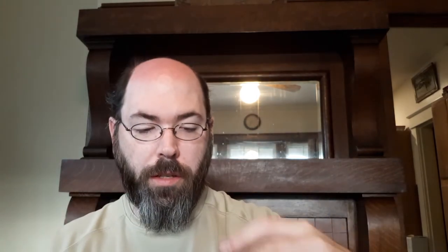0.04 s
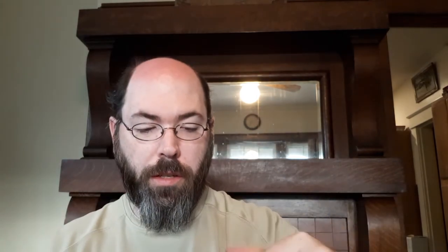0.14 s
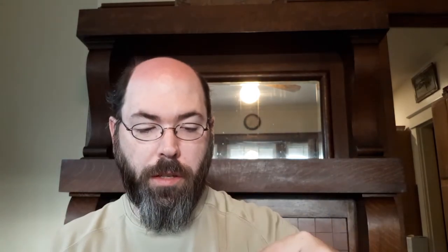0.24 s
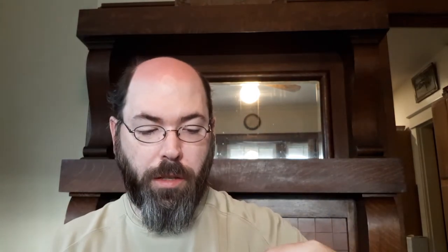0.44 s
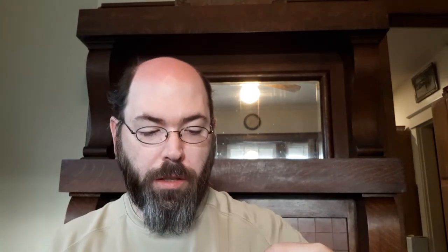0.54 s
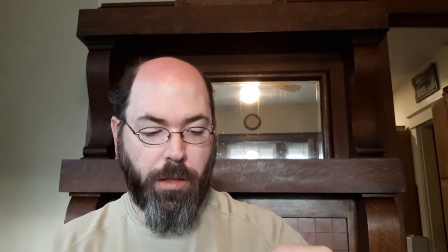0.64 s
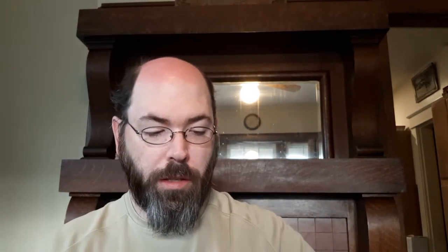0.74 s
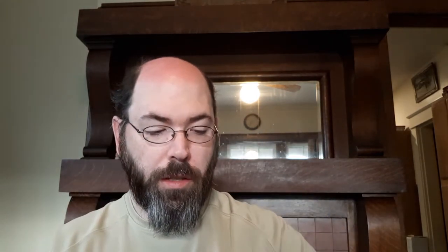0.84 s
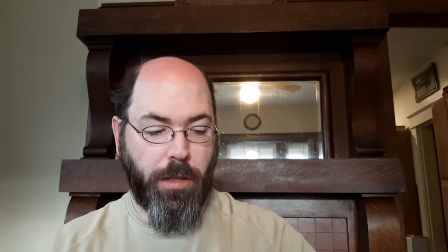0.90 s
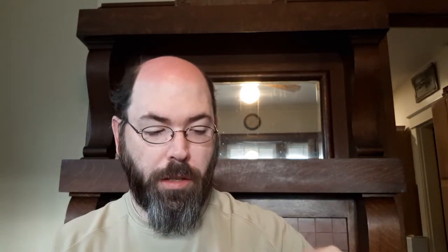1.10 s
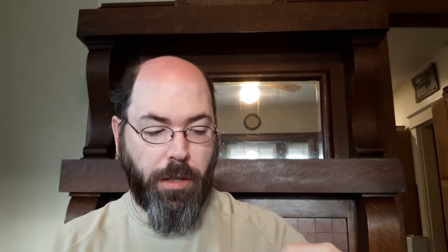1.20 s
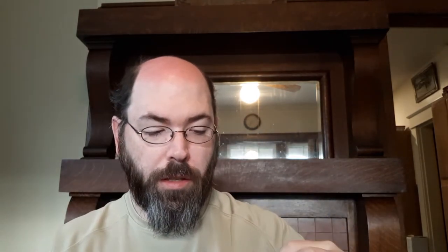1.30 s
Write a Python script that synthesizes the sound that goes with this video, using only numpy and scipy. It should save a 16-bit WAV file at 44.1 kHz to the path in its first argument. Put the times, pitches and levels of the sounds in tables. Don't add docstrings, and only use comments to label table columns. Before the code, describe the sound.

An aluminium canteen is handled close to a stereo microphone in a quiet furnished room: cap taps and a thread squeak, a loud ringing clank, gritty scraping with fainter squeaks, a second hard knock, then small rattles.

```python
import sys
import numpy as np
from scipy import signal
from scipy.fft import rfft, irfft
from scipy.io import wavfile
from scipy.ndimage import uniform_filter1d

SR = 44100
rng = np.random.default_rng(int(sys.argv[2]) if len(sys.argv) > 2 else 0)


def store_pcm(level_fs):
    pcm = np.round(np.clip(level_fs, -1, 1) * 32767).astype(np.int16)
    wavfile.write(sys.argv[1], SR, np.atleast_2d(pcm).T)


def volts_from_decibels(level):
    exponent = np.asarray(level, float) / 20
    return 10 ** exponent


N = 59535
LEAD = 4096
LONG = N + LEAD
CLOCK = (np.arange(LONG) - LEAD) / SR
MID_SIDE = np.array([[1], [-1]])


def curve(table, hz):
    table = np.array(table, float)
    return np.interp(np.log(np.maximum(hz, 1)), np.log(table[:, 0]), table[:, 1])


def unit(x):
    return x / np.sqrt(np.mean(x ** 2))


def over(x, response):
    return signal.fftconvolve(np.atleast_2d(x), np.atleast_2d(response), axes=1)[:, :x.shape[-1]]


def colour(x, table):
    cepstrum = irfft(curve(table, np.arange(513) * SR / 1024) * np.log(10) / 20)
    cepstrum[1:512] *= 2
    cepstrum[513:] = 0
    return over(x, irfft(np.exp(rfft(cepstrum))))


def band(x, hz, width_hz):
    return signal.lfilter(*signal.iirpeak(hz, hz / width_hz, SR), x)


def decay(t, t60):
    return np.exp(-np.log(1000) * t / t60)


# f/Hz, share of chance phase (0-1)
APART = [(300, 0.11), (1500, 0.34), (3000, 0.84), (5000, 0.95), (14000, 1.)]


def ring(pitches, modes):
    t = np.arange(SR // 2) / SR
    turns = rng.uniform(-np.pi, np.pi, len(modes))
    out = 0
    for hz, (db, t60), turn in zip(pitches, modes, turns):
        lead = np.array([[0.5], [-0.5]]) * turn * curve(APART, hz)
        out = out + volts_from_decibels(db) * decay(t, max(t60, 0.005)) * np.sin(2 * np.pi * hz * t + lead)
    return out


def wash(bands):
    t = np.arange(SR // 2) / SR
    out = 0
    for hz, width_hz, db, t60 in bands:
        spread = np.array([[1, 1], [1, -1.4]]) * [1, curve(APART, hz)]
        pair = spread @ rng.standard_normal((2, len(t)))
        narrow = band(band(pair, hz, width_hz), hz, width_hz)
        out = out + volts_from_decibels(db) * unit(narrow) * decay(t, t60)
    return out


def blows(rows, column, length_s, rough, channels, rise_s=0):
    size = 1024
    grit = rng.standard_normal((len(rows), channels, size))
    t = np.arange(1, size + 1) / SR
    fade = np.exp(-t / length_s) * (1 - np.exp(-t / max(rise_s, 1e-6)))
    out = np.zeros((channels, LONG + size))
    for row, g in zip(rows, grit):
        push = rough * g * fade / np.sqrt(np.sum(fade ** 2))
        push[:, 0] += 1 - min(rough, 1)
        i = int(row[0] * SR) + LEAD
        out[:, i:i + size] += volts_from_decibels(row[column]) * push
    return out[:, :LONG]


# f/Hz, level/dB per Hz
AIR = [(25, -16), (90, -11), (125, -9.5), (400, -5), (650, -14.5), (3000, -11.5), (8000, -26.5),
       (16000, -25)]
AIR_DB, HUM_DB, HUM_HZ, HUM_WIDTH_HZ = -62, -70.5, 128, 9.4


def air():
    mid, side, hum = rng.standard_normal((3, LONG))
    tone = colour(mid + 0.41 * side * MID_SIDE, AIR)
    hum = band(hum, HUM_HZ, HUM_WIDTH_HZ)
    return volts_from_decibels(AIR_DB) * unit(tone) + volts_from_decibels(HUM_DB) * unit(hum)


# f/Hz, t60/s
ROOM_T60 = [(250, 1), (1000, 0.4), (3000, 0.54), (7000, 0.38), (14000, 0.21)]
ROOM_DB, ROOM_START_S, ROOM_SIDE = -7.5, 0.0015, 0.86


def room():
    t = np.arange(SR // 2) / SR
    mid, side = rng.standard_normal((2, len(t)))
    noise = rfft(mid + ROOM_SIDE * side * MID_SIDE)
    octave = np.log2(np.maximum(np.arange(noise.shape[1]) * SR / len(t), 100) / 125)
    tail = 0
    for k in range(9):
        share = np.clip(1 - abs(octave - k), 0, 1)
        tail = tail + irfft(noise * share, len(t)) * decay(t, curve(ROOM_T60, 125 * 2 ** k))
    tail = tail * np.clip(t / ROOM_START_S - 1, 0, 1)
    return volts_from_decibels(ROOM_DB) * tail / np.sqrt(np.sum(tail[0] ** 2))


# t/s, level/dB, f/Hz, t60/s
THUMPS = [(.303, -42, 640, 0.069), (.304, -67, 58.7, 0.073), (.305, -49, 250, 0.034),
          (0.328, -47.5, 205, 0.081), (0.329, -44, 529, 0.08), (0.382, -38, 776, 0.05),
          (0.68, -53, 514, 0.036), (.691, -53, 515, 0.044), (1, -57, 590, .05), (.863, -51.5, 472.2, 0.056),
          (1.089, -40, 797, 0.051), (1.108, -50, 154, 0.17), (1.133, -59, 227, 0.53),
          (1.233, -53.5, 153, 0.19), (1.236, -54.5, 390, 0.12)]
THUMP_Q, THUMP_TONE = 1.48, 0.59


def thumps():
    out, noise = np.zeros(LONG), rng.standard_normal(LONG)
    for start, db, hz, t60 in THUMPS:
        t = np.maximum(CLOCK - start, 0)
        width_hz = hz / THUMP_Q
        rumble = unit(band(band(noise, hz, width_hz), hz, width_hz))
        swell = (1 - np.exp(-t * hz / 0.5)) * decay(t, t60)
        out += volts_from_decibels(db) * swell * (rumble + THUMP_TONE * np.sin(2 * np.pi * hz * t))
    return out


# start t/s, jump t/s, end t/s, low level/dB, high level/dB
SQUEAKS = [
    (0.215, 0.2245, 0.233, -38, -32),
    (.233, .232, .244, -30, -23),
    (0.477, 0.472, 0.51, -42, -41.5),
    (.497, 0.497, .507, -42, -32),
    (0.553, 0.5655, .576, -33.5, -28),
]
# multiple of f, level/dB
SQUEAK_TONES = [(1, -2), (2, -12), (3, -24.5), (4, -24.5)]
SQUEAK_LOW_HZ, SQUEAK_HIGH_HZ, SQUEAK_SAG_HZ_PER_S = 1532, 1812, 5700
JUMP_S, SQUEAK_SWELL, SQUEAK_WOBBLE = 0.0046, 0.91, 0.0148


def squeaks():
    wobble = 1 + SQUEAK_WOBBLE * unit(uniform_filter1d(rng.standard_normal(LONG), size=90))
    out = np.zeros(LONG)
    for start, jump, end, low_db, high_db in SQUEAKS:
        up = np.clip((CLOCK - jump) / JUMP_S, 0, 1)
        low_hz = SQUEAK_LOW_HZ - SQUEAK_SAG_HZ_PER_S * np.clip(CLOCK - start, 0, jump - start)
        hz = (low_hz + up * (SQUEAK_HIGH_HZ - low_hz)) * wobble
        phase = 2 * np.pi * np.cumsum(hz) / SR
        off_peak = abs(CLOCK - jump - 0.48 * (end - jump)) / (end - jump)
        swell = volts_from_decibels(-20 * SQUEAK_SWELL * up * off_peak)
        gate = np.clip(np.minimum((CLOCK - start) / 0.0012, (end - CLOCK) / 0.0011), 0, 1)
        level = gate * volts_from_decibels(low_db + up * (high_db - low_db))
        tones = sum(volts_from_decibels(db) * np.sin(k * phase) for k, db in SQUEAK_TONES)
        out += level * swell * np.sqrt(2) * tones
    return out


# t/s, level/dB
RATTLES = [(.182, -50), (.2235, -35), (.2265, -39), (.238, -38), (.306, -23), (.3085, -10), (.692, -18),
           (1.016, -50), (1.233, -40), (.2855, -28.5), (.598, -48), (.6025, -47.5), (.6465, -39),
           (.8665, -37), (1.021, -39), (1.0745, -38), (1.0935, -32.5), (1.1125, -32), (1.1195, -25),
           (1.133, -27), (1.136, -28), (1.1405, -27.5), (1.238, -36), (1.242, -41)]
# f/Hz, level/dB per Hz
RATTLE = [(1000, -11), (3000, -6.5), (5000, -9.5), (7000, 3.5), (8500, -9.5), (12000, -10.5), (16000, -5.5)]
RATTLE_S, CRACK_RISE_S = 0.0023, 0.0013


def rattles():
    chain = blows(RATTLES, column=1, length_s=RATTLE_S, rough=1, channels=2, rise_s=CRACK_RISE_S)
    return colour(chain * np.sqrt(RATTLE_S * SR), RATTLE)


SHOULDER_HZ = [1500, 1665, 1790, 1860, 2350]
# level/dB, t60/s
SHOULDER = [(-6.5, 0.019), (-34, 0.076), (-2, 0.04), (-1.5, 0.027), (-5.5, 0.084)]
# centre f/Hz, width f/Hz, level/dB, t60/s
SHOULDER_WASH = [(2060, 1600, -8, 0.096)]


def shoulder_ring():
    return ring(SHOULDER_HZ, SHOULDER) + wash(SHOULDER_WASH)


# f/Hz, level/dB per Hz
CRACK = [(800, -13), (1100, -2.5), (2000, -6), (3500, -3), (4700, -13), (7100, 1), (8200, -9),
         (16000, -26.5)]


def metal(contact):
    return colour(contact, CRACK)


# t/s, level/dB
SCRAPE = [
    (0.0, -63.5),
    (0.282, -30.5),
    (0.394, -25),
    (0.54, -38.5),
    (1.292, -73),
    (1.35, -64),
]
SCRAPE_DB, SCRAPE_PER_S, SCRAPE_SCATTER_DB, SCRAPE_BODY_DB = -12.5, 900, 1.5, -30


def scrape(shoulder):
    chance = rng.random((2, LONG))
    sizes = volts_from_decibels(-SCRAPE_SCATTER_DB * np.log(chance[1] + 1e-9)) * rng.standard_normal(LONG)
    clicks = unit((chance[0] < SCRAPE_PER_S / SR) * sizes)
    clicks = clicks * volts_from_decibels(np.interp(CLOCK, *np.array(SCRAPE).T) + SCRAPE_DB)
    rung = over(clicks, shoulder / np.sqrt(np.sum(shoulder[0] ** 2)))
    return metal(clicks) + volts_from_decibels(SCRAPE_BODY_DB) * rung


CONTACT_S = 0.0006
# t/s, low modes level/dB, high pair level/dB, neck level/dB
STRIKES = [(-.03, -22.5, -24, -30), (.189, -57, -48, -68), (.3075, -20, -11.5, -31), (.431, -38, -34, -58),
           (.5, -54, -55, -35.5), (.598, -43, -37, -39), (.646, -33, -43.5, -34.5),
           (.692, -35, -39.5, -23.5), (.8655, -36, -29, -38.5), (.895, -30, -55, -55),
           (.925, -59, -49, -61.5), (1.019, -43, -38.5, -54), (1.038, -39, -49, -54),
           (1.091, -47, -34.5, -39.5), (1.115, -39, -40, -47), (1.238, -34, -43, -46)]
BELL_HZ = [2336, 2460, 2735]
# level/dB, t60/s
BELL = [(-10.5, 0.19), (-18.5, 0.15), (-13, 0.25)]
BASE_HZ = [3353, 3357]
# level/dB, t60/s
BASE = [(-8.5, 0.45), (-2.5, 0.11)]
NECK_HZ = [4039]
# level/dB, t60/s
NECK = [(0.5, 0.096)]
# t/s, level/dB
GRIP = [(0, 0.5), (.3, -0.5), (.348, 0), (.358, -9), (.42, -12), (.432, -3), (.462, -2), (.47, -14),
        (.59, -4), (.596, -0.5), (.905, -0.5), (.915, -13), (.93, 0), (1.13, -1.5), (1.14, -6), (1.35, -5)]


def bells():
    rings = ring(BELL_HZ, BELL), ring(BASE_HZ, BASE), ring(NECK_HZ, NECK)
    struck = []
    for column, bell in enumerate(rings, start=1):
        push = blows(STRIKES, column, length_s=CONTACT_S, rough=0.26, channels=1)
        struck.append(over(push, bell))
    low, pair, neck = struck
    return low + neck + pair * volts_from_decibels(np.interp(CLOCK, *np.array(GRIP).T))


# t/s, crack level/dB, belly level/dB, shoulder level/dB, wall level/dB
KNOCKS = [(0.186, -39, -44.5, -47, -72), (0.1913, -38.5, -46.5, -40, -65), (0.2235, -26.5, -27.5, -31, -68),
          (0.2845, -33, -36, -39, -45), (0.3018, -25, -44, -33.5, -39), (0.3053, -8, -34.5, -27.5, -42),
          (0.3078, -0.5, -24, -19, -47), (0.3139, -18, -29, -15, -39), (0.3349, -27, -33.5, -48, -49),
          (0.3874, -27, -60, -36, -34.5), (0.463, -38, -39.5, -36, -45), (0.4818, -31.5, -52, -34, -65),
          (0.4996, -34.5, -39, -32.5, -41), (0.5447, -37.5, -50, -40, -59), (0.597, -39, -43.5, -33.5, -50),
          (0.6449, -42, -51, -40.5, -43)]
# t/s, crack, belly, shoulder, wall level/dB
LATE_KNOCKS = [(0.6908, -11, -27, -19, -21.5), (0.7022, -14.5, -36.5, -41, -41),
               (0.8475, -34, -43, -53, -59), (0.8639, -22, -43, -25.5, -43), (0.8924, -39, -59, -37, -73),
               (1.0195, -29, -45, -42.5, -56), (1.0378, -35.5, -53.5, -31.5, -58),
               (1.071, -34, -46, -64, -59), (1.0835, -41, -35, -37, -65),
               (1.0907, -32, -38.5, -35.5, -42.5), (1.1144, -25.5, -40, -34, -59),
               (1.1345, -25, -52, -39.5, -45), (1.1395, -26.5, -42.5, -41, -74),
               (1.2365, -34, -38.5, -38, -47)]
# t/s, crack, belly, shoulder, wall level/dB
EARLIER_KNOCK = [
    (-0.044, -16.5, -42.5, -26.5, -33),
]
ALL_KNOCKS = list(EARLIER_KNOCK) + list(KNOCKS) + list(LATE_KNOCKS)
CRACK_S = 0.002


def cracks():
    burst = blows(ALL_KNOCKS, column=1, length_s=CRACK_S, rough=0.92, channels=2, rise_s=CRACK_RISE_S)
    burst = burst * np.sqrt(CRACK_S * SR / 2)
    return volts_from_decibels(-0.5) * metal(burst + 0.27 * burst[::-1])


RIM_HZ = [5425, 5830, 5890, 6617, 6778, 6947, 7122, 7212, 10572]
# level/dB, t60/s
RIM = [(0, 0.039), (-4.5, 0.08), (-4, 0.077), (-11.5, 0.11), (-10.5, 0.148), (3.5, 0.062), (-0.5, 0.06),
       (-4, 0.11), (-7, 0.028)]
# centre f/Hz, width f/Hz, level/dB, t60/s
RIM_WASH = [(5820, 2900, -8, 0.35), (10600, 6300, -16, 0.17), (14700, 14000, -9.5, 0.2)]
BODY_HZ = [1072, 1100, 1258]
# level/dB, t60/s
BODY = [(-3, 0.099), (-3, 0.099), (-9.5, 0.078)]
# centre f/Hz, width f/Hz, level/dB, t60/s
BODY_WASH = [(1163, 270, -6.5, 0.083)]
WALL_HZ = [2315, 4420, 4580, 4980, 5344, 5500]
# level/dB, t60/s
WALL = [(-2, 0.1), (-5, 0.088), (-10, 0.077), (3.5, 0.093), (-3, 0.062), (-4, 0.055)]
# centre f/Hz, width f/Hz, level/dB, t60/s
WALL_WASH = [(4610, 1900, -3.5, 0.31)]
RIM_DB, BODY_DB, SHOULDER_DB, WALL_DB = -17, 0, 0, -2.5


def shell(shoulder):
    rim = ring(RIM_HZ, RIM) + wash(RIM_WASH)
    belly = ring(BODY_HZ, BODY) + wash(BODY_WASH)
    wall = ring(WALL_HZ, WALL) + wash(WALL_WASH)
    families = [(RIM_DB, rim), (BODY_DB, belly), (SHOULDER_DB, shoulder), (WALL_DB, wall)]
    out = 0
    for column, (db, response) in enumerate(families, start=1):
        push = blows(ALL_KNOCKS, column, length_s=CONTACT_S, rough=0.64, channels=1)
        out = out + volts_from_decibels(db) * over(push, response)
    return out


def highpass(x, hz):
    return signal.sosfilt(signal.butter(4, hz, "high", fs=SR, output="sos"), x)


THIN_HZ, THUD_HZ, THUD_DB = 920, 253, -17.5


def flask():
    shoulder = shoulder_ring()
    out = shell(shoulder) + rattles() + cracks() + scrape(shoulder)
    return highpass(out, THIN_HZ) + volts_from_decibels(THUD_DB) * highpass(out, THUD_HZ)


SQUEAK_ROOM_DB, BELL_ROOM_DB = -0.5, -14.5


def scene():
    near, squeak, bell = flask() + thumps(), squeaks(), bells()
    sent = near.mean(axis=0) + volts_from_decibels(SQUEAK_ROOM_DB) * squeak + volts_from_decibels(BELL_ROOM_DB) * bell.mean(axis=0)
    return (near + squeak + bell + over(sent, room()) + air())[:, LEAD:]


def roll_off(x):
    return signal.sosfilt(signal.butter(12, 16800, fs=SR, output="sos"), x)


# f/Hz, left minus right level/dB
BALANCE_DB = [(300, 1), (1500, -2), (3000, 0), (5500, 0), (7000, 8), (10000, 6), (14000, 1.7)]
# f/Hz, level/dB
MIC = [(3450, 0), (3800, -4), (4150, 0.5), (7250, 0.5), (7700, -6), (8300, -0.5), (15600, -3.5),
       (16100, -24)]


def record(dry):
    ports = []
    for channel, sign in zip(dry, (1, -1)):
        tilt = [(hz, sign * db / 2) for hz, db in BALANCE_DB]
        ports.append(colour(channel, tilt)[0])
    mix = np.clip(colour(np.array(ports), MIC), -1, 1)
    return roll_off(mix)


dry = scene()
out = record(dry)
store_pcm(out)
```